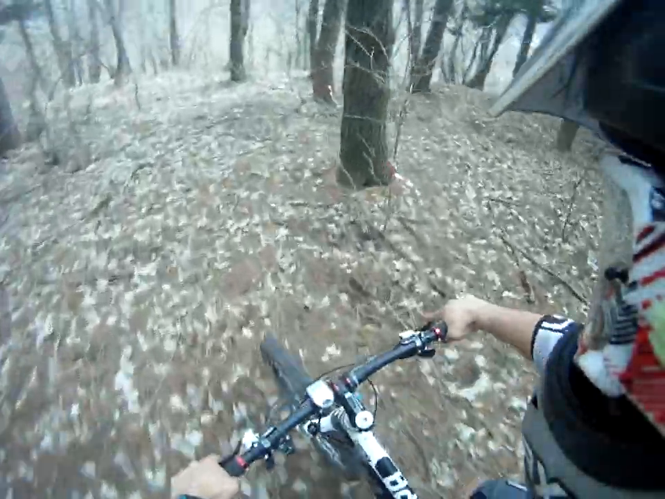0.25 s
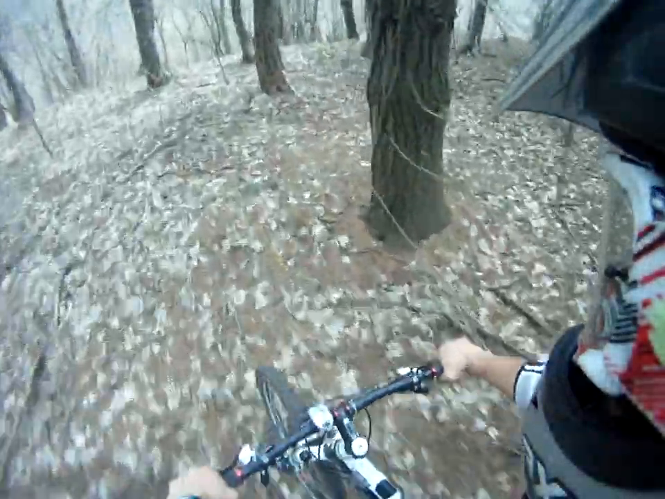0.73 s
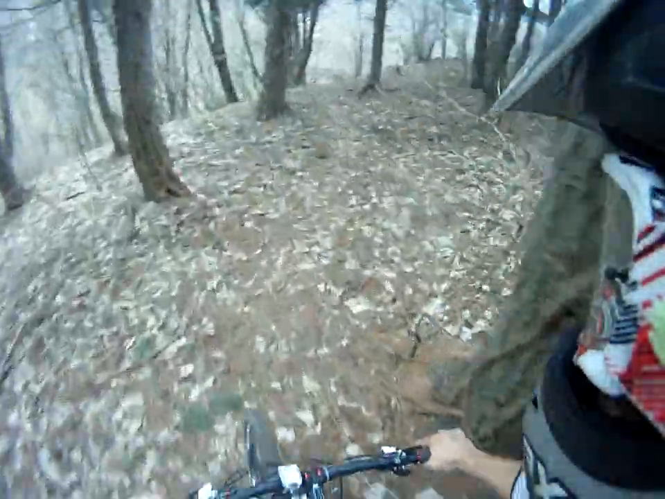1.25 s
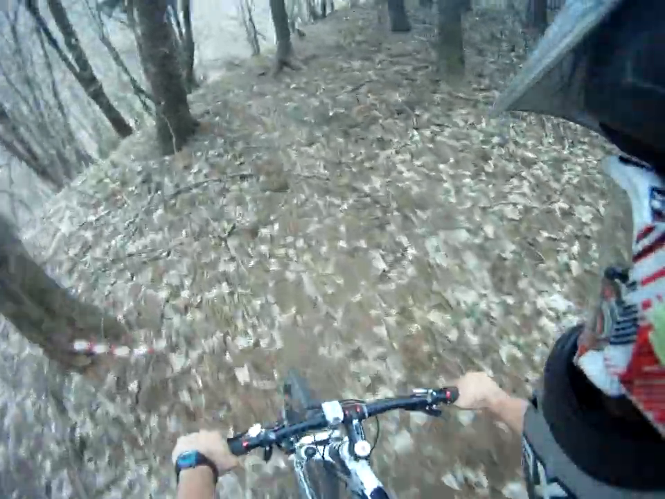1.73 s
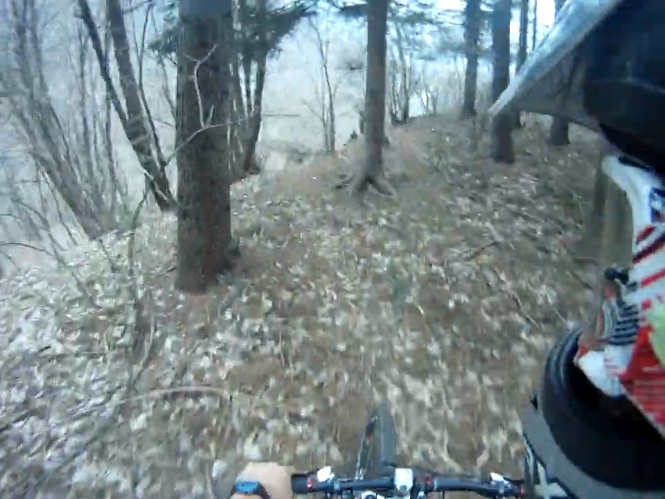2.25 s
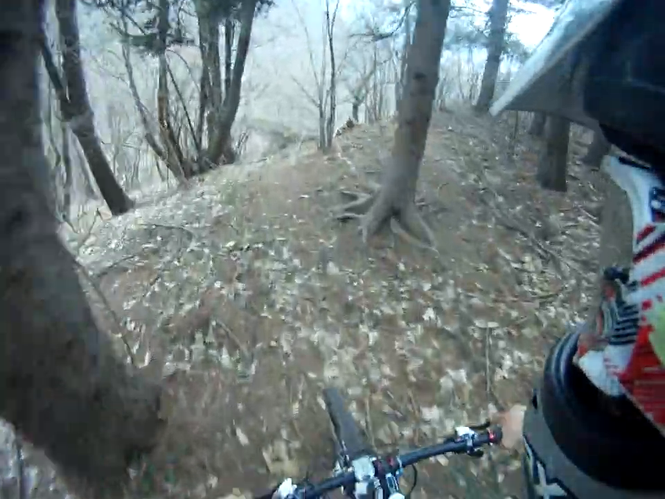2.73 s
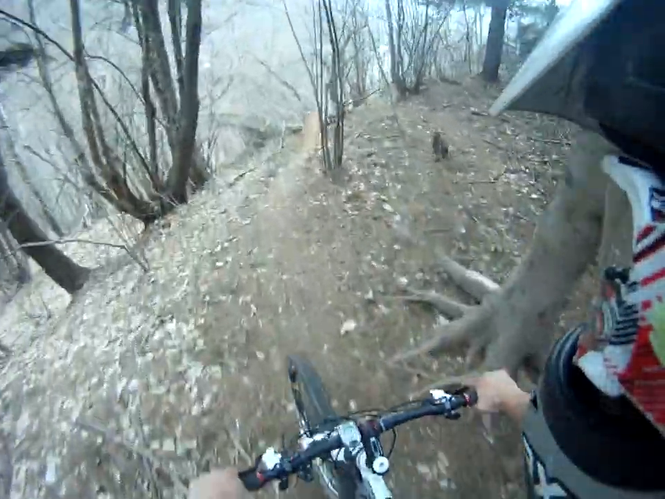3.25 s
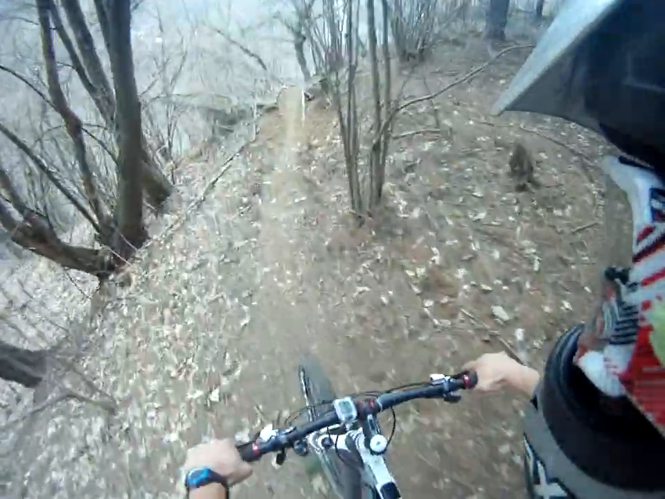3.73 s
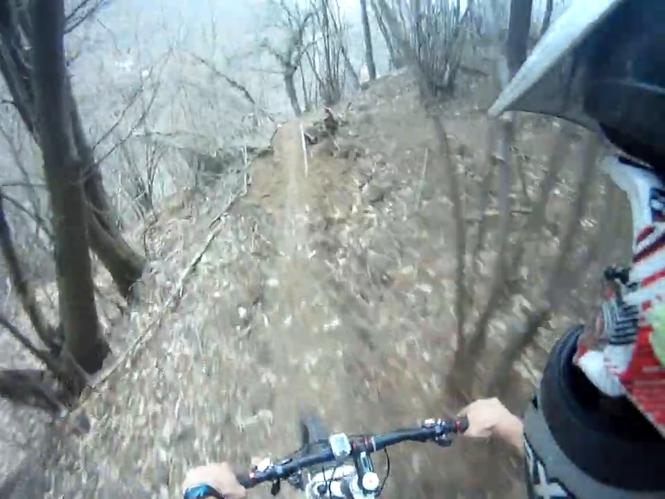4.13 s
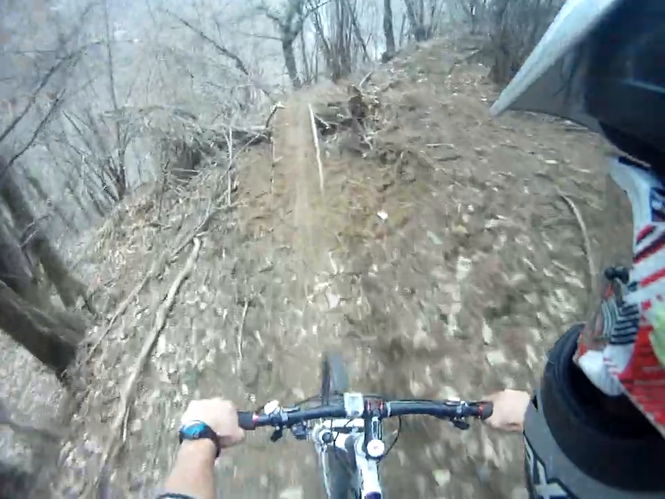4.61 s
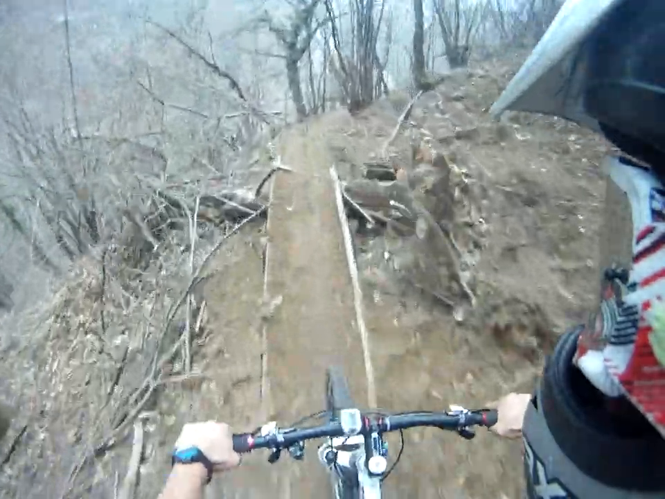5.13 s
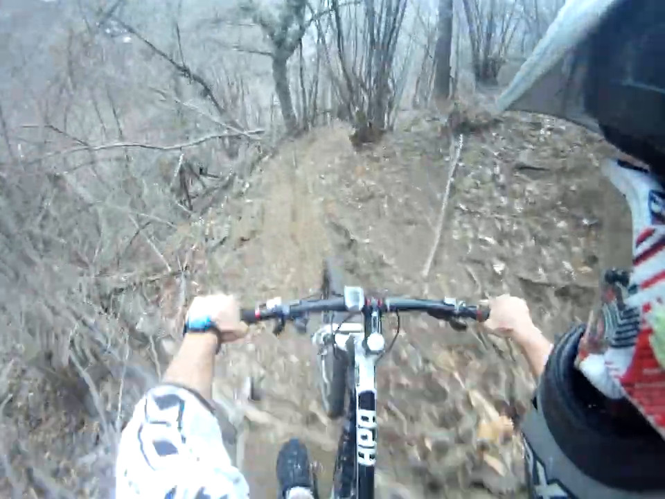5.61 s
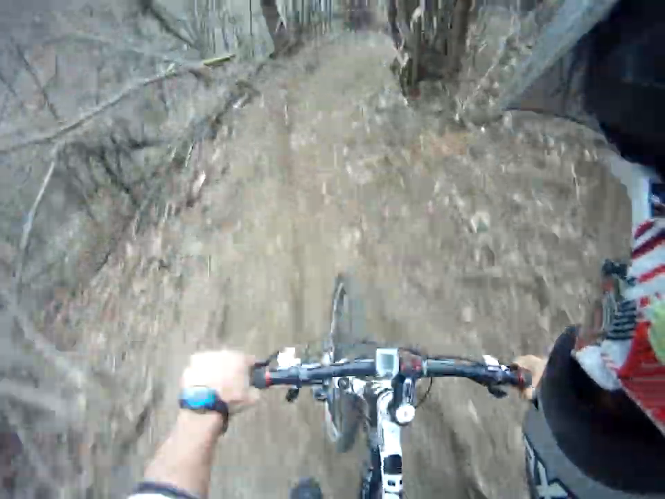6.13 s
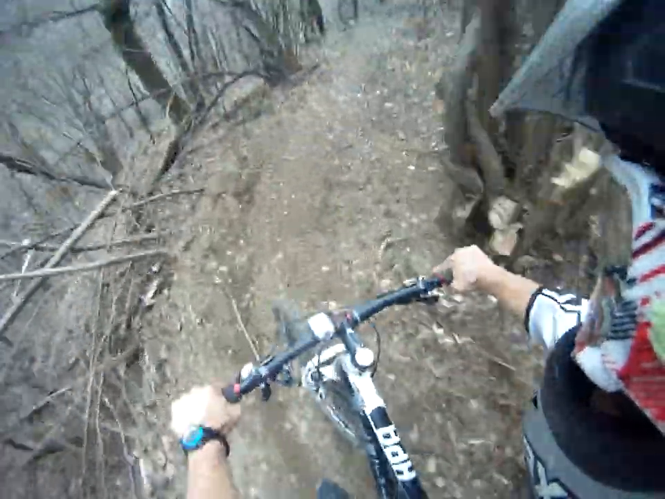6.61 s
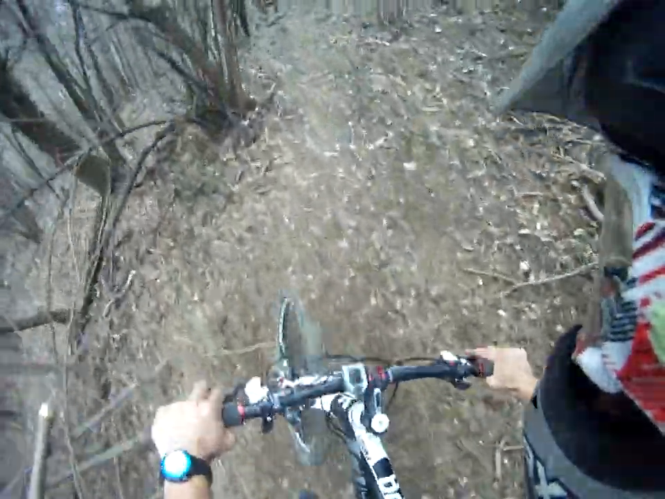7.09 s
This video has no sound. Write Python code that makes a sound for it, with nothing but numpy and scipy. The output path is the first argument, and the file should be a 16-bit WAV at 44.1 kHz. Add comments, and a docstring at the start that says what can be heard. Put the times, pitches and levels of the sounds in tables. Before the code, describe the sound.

Mountain bike tyres crunch fast through dry leaves, chain and frame rattling, a branch cracks loudly against the microphone, then a drop, hard landing and skid.

```python
"""Mountain bike tyres crush dry leaves on a forest trail; the microphone rides on the helmet in a plastic housing.
Below it knobs patter, drone and hum, and chain, frame and sticks clatter as noise bursts rung through resonances.
Close by, wind buffets as low noise. A thin branch whips the housing: decaying modes and scraping grains
overload the microphone and the gain control ducks. Late on the bike drops off a ledge, lands and skids."""
import sys
import numpy as np
from scipy import signal
from scipy.fft import rfft, irfft
from scipy.io import wavfile
from scipy.ndimage import uniform_filter1d, minimum_filter1d

SR = 44100
rng = np.random.default_rng(int(sys.argv[2]) if len(sys.argv) > 2 else 0)


def digitize_waveform(pressure):
    """Quantize a signal to 16-bit integers and store it at the path in sys.argv[1].

    Rows of a 2-D input are taken as channels; values are limited to [-1, 1].
    """
    field = np.atleast_2d(pressure).T
    bounded = np.clip(field, -1, 1)
    quanta = np.round(bounded * 32767).astype(np.int16)
    wavfile.write(sys.argv[1], SR, quanta)


N = 324557
TIME = np.arange(N) / SR   # s
CUTOFF_HZ = 15500

# How hard the tyres crush the leaves: [t/s, crunch level/dB before a small trim]
LEAF_CRUSH = [(0.0, -52), (0.35, -48), (1.27, -51), (1.66, -47.5), (2.03, -51), (2.64, -52), (3.11, -46),
              (3.75, -54), (4.16, -51.5), (5.76, -50), (6.37, -39), (6.44, -40), (6.58, -44), (6.91, -43.5),
              (7.19, -49.5), (7.36, -52.5)]
# Leaf spectrum, relative: [f/Hz, density/dB per Hz]
LEAF_COLOUR = [(200, -17), (600, -3.5), (1000, -2.5), (1600, -2), (2900, -3), (3800, -9), (5000, -11),
               (8000, -18), (11000, -17.5), (15000, -19.5)]
# Resonances and dips of the plastic housing: [f/Hz, width/Hz, height/dB]
HOUSING_PEAKS = [(2833, 560, 5), (4070, 220, -5.5), (4900, 670, 2.5), (6006, 870, -17.5), (7130, 670, 4),
                 (7990, 660, -3.5), (9140, 1630, 11), (11610, 400, 9), (11900, 440, -14.5), (12710, 350, 9),
                 (13300, 1000, -5), (14600, 700, 12)]

# How hard the tyres are pressed on the ground: [t/s, middle drone level/dB]
TYRE_DRONE = [(0, -50), (0.5, -42.5), (0.95, -50.5), (1.2, -50), (1.45, -47), (1.72, -44), (2.15, -50),
              (2.55, -46.5), (2.78, -47), (3.25, -42), (3.72, -50), (4.15, -47.5), (4.8, -47.5), (5.8, -45),
              (6.17, -39.5), (6.33, -30), (6.64, -41), (6.85, -37.5), (7.36, -44.5)]
# Tyre spectrum, relative: [f/Hz, density/dB per Hz]
TYRE_COLOUR = [(80, -7.5), (190, -6.5), (290, 1), (400, -3), (510, 2.5), (570, 1), (680, -2), (820, -13.5),
               (1200, -19.5), (3000, -72)]

# Air speed round the helmet, as buffeting: [t/s, middle level/dB]
AIR_SPEED = [(0, -53), (0.43, -43.5), (0.65, -47), (1.75, -51.5), (2.15, -50.5), (2.35, -42.5),
             (2.8, -44.5), (3.7, -50.5), (4.08, -48.5), (4.3, -39.5), (4.6, -46), (5.25, -37.5),
             (5.48, -41), (5.66, -35), (5.84, -39), (6.0, -29), (6.28, -35.5), (6.55, -39.5), (7.36, -60)]
# Wind spectrum, relative: [f/Hz, density/dB per Hz]
WIND_COLOUR = [(10, -8.5), (25, 0), (45, -0.5), (80, -0.5), (120, -6.5), (180, -8.5), (300, -14.5),
               (600, -21), (2000, -57)]

# Tread humming on patches of hard soil: [middle t/s, half length/s, level/dB, knob rate f/Hz at the middle]
TREAD_HUMS = [(0.24, 0.08, -39, 547), (1.5, 0.17, -49.5, 528), (3.32, 0.15, -42.5, 563),
              (4.13, 0.2, -47.5, 505), (6.5, 0.1, -40, 497), (7.05, 0.16, -48, 510.6)]
KNOB_GLIDE_HZ_PER_S, KNOB_JITTER, HUM_FLUTTER_DB = 90, 0.0469, 4.5   # jitter: rms fraction of the rate

# The light metal tick of the chain: [f/Hz, width/Hz, height/dB]
CHAIN_RINGS = [(2780, 640, 10), (5200, 2500, -3), (9200, 700, 7), (14800, 700, 5)]

# Frame parts and stones clacking over bumps:
# [t/s, level/dB, thud height/dB, clack height/dB, after-rattle/dB re the crack]
RATTLES = [(0.0752, -34, 20, 18, -13), (0.0804, -30.5, 17, -4, -12), (0.5467, -29.5, 14, 12, -35),
           (0.7844, -37.5, 11, 8, -13), (1.068, -36.5, 18, 6, -10), (1.3758, -34.5, 11, -3, -1),
           (1.4028, -33, 23, 7, -16), (1.6437, -30.5, -7, 10, -18), (1.649, -30.5, 7, 0, -18),
           (1.692, -29, -3, -1, -16), (1.772, -32.5, 11, 2, -1), (2.2707, -35, 12, 0, -5),
           (2.3276, -35.5, -8, 6, -9), (2.9941, -30, 5, 4, -14), (3.1243, -35, 27, 16, -26),
           (3.7249, -40, -6, 1, -21), (3.9654, -36, 10, 8, -16), (4.133, -39.5, -6, 16.5, -9),
           (4.1865, -35.5, 11, 6, -11), (4.221, -40.5, -2, 14, -2), (4.8404, -37.5, -11, 18, -29),
           (5.8765, -37, 1, -9, -23), (6.2542, -20, 6, 6, -2), (6.3104, -15, 6, -1, -26),
           (6.3639, -27.5, 6, 6, -1), (6.4098, -23.5, -2, 1, -13), (6.4278, -22, 6.5, 0, -17),
           (6.4597, -37, 2, 9, -15), (6.4991, -23.5, 13.5, 3, -7), (6.7361, -31.5, 24, 5, -23),
           (6.8857, -24.5, -9, 13, -37), (7.227, -36, -10, -1, -20)]
# Rattle spectrum, relative: [f/Hz, density/dB per Hz]
RATTLE_COLOUR = [(100, -8.5), (500, 10), (1000, 0), (2800, 5), (4000, -6), (7000, -10), (10000, -18),
                 (15000, -14.5)]
# What the rattling bike rings with: [f/Hz, width/Hz, height/dB]
FRAME_RINGS = [(1156, 60, 5.5), (1670, 64, 3), (2235, 140, 7), (2940, 76, 8), (3480, 110, 7),
               (4860, 510, 4.5), (7380, 440, 3), (9050, 490, 7.5), (10000, 1200, 7.5)]
# Lighter clacks at random times; their level is relative to the leaf crunch
JOLTS_PER_S, JOLT_DB, JOLT_SPREAD_DB = 4.6, 7.5, 1
JOLT_THUD_DB, JOLT_CLACK_DB, JOLT_AFTER_DB = -3, 11, -20   # thud and clack are middle values

# The suspension taking the ground: [t/s, level/dB, thud f/Hz]
THUMPS = [(0.123, -33.5, 280), (0.626, -35.5, 383), (1.933, -36, 372), (2.267, -33.5, 312),
          (2.46, -36.5, 378), (2.97, -33.5, 262), (3.199, -33, 314), (4.261, -34, 95), (4.316, -39, 80),
          (4.918, -34, 109), (5.629, -37, 62), (6.02, -26, 55), (6.062, -28, 55), (6.142, -31, 60),
          (6.2104, -21.5, 257), (6.225, -22.5, 136), (6.242, -21.5, 70), (6.498, -29, 444)]
# Thump spectrum, relative: [f/Hz, density/dB per Hz]
THUMP_COLOUR = [(20, 8.5), (60, -1), (120, 4.5), (250, -4.5), (550, -0.5), (1000, -17), (3000, -35)]

# The chain slapping the frame: [t/s, level/dB, crack t60/s, after-rattle/dB re the crack]
CHAIN_SLAPS = [(0.4936, -27, 0.0063, -27), (0.519, -32, 0.0076, -25), (1.5112, -17.5, 0.021, -9.5),
               (1.667, -32, 0.014, -31), (1.686, -26.5, 0.016, -15), (1.696, -30, 0.014, -30),
               (3.0598, -17.5, 0.014, -18), (5.3137, -30.5, 0.008, -19), (5.3287, -40, 0.008, -20)]
# Slap spectrum, relative: [f/Hz, density/dB per Hz]
SLAP_COLOUR = [(100, -13), (380, -3.5), (560, 6.5), (800, -10), (1200, -9), (1500, 0.5), (2000, -5.5),
               (2800, 3.5), (4000, -11), (5000, -13.5), (7000, -14), (10500, -24.5), (15000, -18)]
# What a slap rings with: [f/Hz, width/Hz, height/dB]
SLAP_RINGS = [(2020, 110, 6), (2940, 260, 1.5), (4500, 160, 10), (7530, 200, 4), (9150, 390, 9.5)]

# Dry twigs and sticks breaking under the wheels: [t/s, level/dB, crack t60/s]
STICKS = [(0.833, -32.5, 0.0054), (0.844, -40, 0.0078), (1.0352, -37, 0.006), (6.3071, -19, 0.044),
          (6.8862, -33, 0.0071)]
# Stick spectrum, relative: [f/Hz, density/dB per Hz]
STICK_COLOUR = [(500, -22), (1700, 12), (3000, -6), (4600, 1), (5600, -11), (7000, -4), (8000, -9),
                (10000, -2), (12000, -30), (15000, 1)]

# The branch striking and bouncing: [t/s, strength/dB, f/Hz that the contact favours]
BRANCH_BLOWS = [(2.6184, 1.5, 2800), (2.6197, 7, 600), (2.6222, 8.5, 5000), (2.628, -5.5, 1500),
                (2.636, -12, 3500), (2.641, -3.5, 800)]
# What the struck housing rings with: [f/Hz, level/dB re the blow, t60/s]
HOUSING_MODES = [(660, -8.5, 0.043), (757, -1.5, .045), (903, -1.5, 0.027), (1190, -8.5, 0.082),
                 (1590, -14, 0.019), (2130, -4, 0.023), (2500, -7.5, .02), (2776, -5.5, 0.021),
                 (3726, -3.5, 0.025), (3773, -3, 0.023), (5010, -7.5, 0.016), (6800, -16, 0.026),
                 (8080, -2.5, 0.03)]
# The bark catching and sliding off: [t/s, length/s, stroke gain/dB]
BARK_SCRAPES = [(2.6275, 0.0017, -12.5), (2.636, 0.0072, -16.5), (2.6508, 0.004, -5), (2.6578, 0.005, -6.5),
                (2.666, 0.005, -11.5)]
# Scrape spectrum, relative: [f/Hz, density/dB per Hz]
SCRAPE_COLOUR = [(200, -5), (900, -9.5), (2200, -1), (3800, 0), (5200, -3.5), (6000, -23), (7000, -7),
                 (9300, -7), (11000, -22.5), (12200, -38), (14700, -8), (16000, -23.5)]
# Resonances that the scraping wakes: [f/Hz, width/Hz, height/dB]
SCRAPE_RINGS = [(1185, 120, 6.5), (2245, 121, 4.5), (2897, 250, 4.5), (3240, 140, 0), (3950, 364, 5),
                (4900, 180, 3), (7060, 195.5, 7), (8230, 420, 5.5), (11400, 500, 9), (12730, 400, 10)]

# Hollow plastic knocks around the drop and landing: [t/s, level/dB, f/Hz]
PLASTIC_KNOCKS = [(5.7779, -20, 1980), (6.074, -24.5, 1160), (6.108, -29, 1020), (6.1309, -27.5, 1860),
                  (6.135, -36, 1110), (6.3067, -16.5, 1800), (6.3308, -21.5, 750)]
# Knock spectrum, relative: [f/Hz, density/dB per Hz]
KNOCK_COLOUR = [(150, -26), (700, 1), (2200, -7), (3200, -7), (4500, -14), (6000, -30), (8500, -15.5),
                (10300, -10), (12000, -32), (13800, -10), (15500, -24)]

# Tyres biting into loose dirt after the landing: [t/s, length/s, stroke gain/dB]
SKIDS = [(6.212, 0.056, -34), (6.31, 0.0069, -26), (6.375, 0.1, -33), (6.56, 0.058, -39.5),
         (6.778, 0.03, -35), (7.035, 0.034, -41)]
# Skid spectrum, relative: [f/Hz, density/dB per Hz]
SKID_COLOUR = [(300, -8), (1000, -6), (2000, 5), (3000, 0.5), (4000, -9.5), (5000, -6.5), (6000, -16),
               (7200, -7.5), (8000, -12), (9800, -8), (12000, -18), (14500, -5)]


def from_db(db):
    """Decibels to gain."""
    return 10 ** (np.asarray(db) / 20)


def rms_one(x):
    """Scale to unit power."""
    return x / np.sqrt(np.mean(x ** 2) + 1e-20)


def at_time(rows, s):
    """Value of a two-column [t/s, value] table at time s, along straight lines."""
    times, values = np.transpose(rows)
    return np.interp(s, times, values)


def decay(t, t60):
    """Exponential fade that falls 60 dB in t60 seconds."""
    return from_db(-60 * t / t60)


def add(track, s, sound):
    """Mix a sound in from time s."""
    start = int(s * SR)
    track[start:start + len(sound)] += sound[:N - start]


def drift(rate):
    """Smooth random wander of spread 1, with a new target rate times a second."""
    knots = rng.standard_normal(N // 20)
    return rms_one(np.interp(TIME * rate, np.arange(len(knots)), knots))


def response(colour, peaks=(), size=4096):
    """Causal (minimum-phase) impulse response of a spectrum with resonances on it."""
    hz = np.maximum(np.fft.rfftfreq(size, 1 / SR), 1)
    points_hz, points_db = np.transpose(colour)
    db = np.interp(np.log(hz), np.log(points_hz), points_db)
    for centre, width, height in peaks:
        db = db + height / (1 + (2 * (hz - centre) / width) ** 2)
    # folding the cepstrum onto positive time gives minimum phase
    cepstrum = irfft(np.log(from_db(db)))
    cepstrum[1:size // 2] *= 2
    cepstrum[size // 2 + 1:] = 0
    return irfft(np.exp(rfft(cepstrum)))[:size // 2]


def through(x, impulse):
    """Pass a sound through an impulse response."""
    return signal.oaconvolve(x, impulse)[:len(x)]


def grains(per_s, spread_db):
    """Random clicks, many small and a few large."""
    born = rng.random(N) < per_s / SR
    sizes = from_db(spread_db * np.minimum(rng.exponential(1, N), 5))
    signs = rng.choice([-1, 1], N)
    return rms_one(born * sizes * signs)


def snaps(low_hz, high_hz, per_s, spread_db, t60, ring_db, count=12, size=800):
    """Brittle things breaking; each kind crackles briefly around a pitch of its own."""
    out, t = np.zeros(N), np.arange(size) / SR
    for hz in np.geomspace(low_hz, high_hz, count):
        splinters = rng.standard_normal(size) * decay(t, t60)
        pitch = response([(hz, 0)], [(hz, hz / 3, ring_db)])
        snap = rms_one(through(splinters, pitch))
        out += through(grains(per_s / count, spread_db), snap)
    return rms_one(out)


def burst(envelope, impulse, level_db):
    """A cluster of tiny impacts under an envelope, rung through a body; the level is that of its loudest 3 ms."""
    impacts = envelope * rng.choice([-1, 1], len(envelope))
    hit = through(impacts, impulse)
    loudest = np.sqrt(uniform_filter1d(hit ** 2, size=128).max())
    return from_db(level_db) * hit / loudest


def clatter(after_db, crack_t60, after_t60=0.15, rise_s=.0003, bounces_per_s=450, size=8000):
    """Envelope of a contact: a short crack and a ragged after-rattle."""
    t = np.arange(size) / SR
    ragged_db = np.interp(t * bounces_per_s, np.arange(size), rng.uniform(-9, 5, size))
    after_rattle = from_db(after_db + ragged_db - 60 * t / after_t60)
    return np.minimum(t / rise_s, 1) * (decay(t, crack_t60) + after_rattle)


def strokes(rows, attack_s, release_t60):
    """Gain of a row of rubbing strokes: each rises, holds for its length and dies away."""
    gain = np.zeros(N)
    for s, length, db in rows:
        rise = np.clip((TIME - s) / attack_s, 0, 1)
        fade_db = 60 * np.clip((TIME - s - length) / release_t60, 0, 4)
        gain += from_db(db - fade_db) * rise
    return gain


def leaves(trim_db=-0.44):
    """Leaves under the wheels break in clumps of brittle snaps over a smooth noise rustle."""
    crackle = snaps(1100, 3300, per_s=600, spread_db=2.0, t60=0.017, ring_db=12.5)
    clumped = crackle * from_db(1.49 * drift(25))
    rustle = from_db(1.5) * rng.standard_normal(N)
    crunch = rms_one(through(clumped + rustle, response(LEAF_COLOUR, HOUSING_PEAKS)))
    return from_db(at_time(LEAF_CRUSH, TIME) + trim_db) * crunch


def tyres(bumps_db=1.23, bumps_per_s=25):
    """Knobs patter on the soil and boom in the casing, unevenly over small bumps."""
    patter = rms_one(through(grains(per_s=1500, spread_db=3.0), response(TYRE_COLOUR)))
    return from_db(at_time(TYRE_DRONE, TIME) + bumps_db * drift(bumps_per_s)) * patter


def wind(gust_db=-0.5, gusts_per_s=14):
    """Lumpy low noise buffets round the helmet, close to the microphone."""
    air = rms_one(through(rng.standard_normal(N), response(WIND_COLOUR)))
    return from_db(at_time(AIR_SPEED, TIME) + gust_db * drift(gusts_per_s)) * air


def tread():
    """On hard patches the knobs fall into an unsteady hum whose pitch climbs within each patch."""
    out, jitter = np.zeros(N), 1 + KNOB_JITTER * drift(110)
    for s, half_s, db, hz in TREAD_HUMS:
        near = np.abs(TIME - s) < 3 * half_s
        t = TIME[near] - s
        knob_hz = (hz + KNOB_GLIDE_HZ_PER_S * t) * jitter[near]
        phase = 2 * np.pi * np.cumsum(knob_hz) / SR
        out[near] += from_db(db) * np.exp(-(t / half_s) ** 2) * np.sin(phase)
    return out * from_db(HUM_FLUTTER_DB * drift(45))


def chain(per_s=23, unevenness=.3, db=6.0, spread_db=2.5, t60=0.011, size=900, count=260):
    """The swinging chain ticks crisply in a loose rhythm, harder where the ground is rough."""
    out, fade = np.zeros(N), decay(np.arange(size) / SR, t60)
    link = response(LEAF_COLOUR, HOUSING_PEAKS + CHAIN_RINGS)
    times = np.cumsum(np.exp(unevenness * rng.standard_normal(count))) / per_s
    forces = np.clip(rng.standard_normal(count), -2, 2)
    for s, force in zip(times[times < TIME[-1]], forces):
        level_db = at_time(LEAF_CRUSH, s) + db + spread_db * force
        add(out, s, burst(fade, link, level_db))
    return out


def rattles(contacts):
    """Each contact clatters through the frame with its own share of thud and clack."""
    out = np.zeros(N)
    for s, level_db, thud_db, clack_db, after_db in contacts:
        body = [(520, 1550, thud_db), (1540, 930, clack_db)]   # f/Hz, width/Hz, height/dB
        frame = response(RATTLE_COLOUR, HOUSING_PEAKS + FRAME_RINGS + body)
        add(out, s, burst(clatter(after_db, crack_t60=0.016), frame, level_db))
    return out


def jolts(count=80):
    """Light contacts at uneven intervals, harder where the ground is rough; rows like RATTLES."""
    times = np.cumsum(rng.uniform(.2, 1.8, count)) / JOLTS_PER_S
    chance = rng.standard_normal((count, 3))
    contacts = []
    for s, (force, thud, clack) in zip(times, chance):
        if s < TIME[-1]:
            level_db = at_time(LEAF_CRUSH, s) + JOLT_DB + JOLT_SPREAD_DB * force
            contacts.append((s, level_db, JOLT_THUD_DB + 5 * thud, JOLT_CLACK_DB + 5 * clack, JOLT_AFTER_DB))
    return contacts


def thumps(t60=0.086, size=6000):
    """A wheel meets the ground and shakes frame, rider and helmet."""
    out, fade = np.zeros(N), decay(np.arange(size) / SR, t60)
    for s, level_db, hz in THUMPS:
        add(out, s, burst(fade, response(THUMP_COLOUR, [(hz, hz / 2, 14)]), level_db))
    return out


def slaps():
    """The chain hits the stay with a bright metal ring, and its links settle."""
    out, metal = np.zeros(N), response(SLAP_COLOUR, HOUSING_PEAKS + SLAP_RINGS)
    for s, level_db, t60, after_db in CHAIN_SLAPS:
        add(out, s, burst(clatter(after_db, crack_t60=t60), metal, level_db))
    return out


def sticks(after_db=-15):
    """Dry wood breaks with a bright, splintering crack; thicker sticks take longer."""
    out, wood = np.zeros(N), response(STICK_COLOUR)
    for s, level_db, t60 in STICKS:
        add(out, s, burst(clatter(after_db, crack_t60=t60, after_t60=8.7 * t60), wood, level_db))
    return out


def squeak(s=1.139, length=0.0091, hz=1540, db=-44):
    """One faint, short squeak: a sine under a bell-shaped envelope."""
    return from_db(db) * np.exp(-((TIME - s) / length) ** 2) * np.sin(2 * np.pi * hz * TIME)


def mount_thud(t, hz=280, db=4.0, rise_s=.001, t60=0.024):
    """The whole mount jolts under the branch as one low, quickly damped swing."""
    return from_db(db) * decay(t, t60) * np.cos(2 * np.pi * hz * t) * (1 - np.exp(-t / rise_s))


def branch(lowest_hz=450, off_pitch_db=3.5, crack_db=-9, crack_t60=.016, thud_s=2.6193, size=6000):
    """A thud and fast blows ring the housing's modes; bark scrapes it between the later blows and after them."""
    out, cracks, t = np.zeros(N), np.zeros(N), np.arange(size) / SR
    for s, blow_db, contact_hz in BRANCH_BLOWS:
        add(cracks, s, from_db(blow_db + crack_db) * decay(t, crack_t60))
        for hz, db, t60 in HOUSING_MODES:
            octaves_off = abs(np.log2(hz / contact_hz))
            strength_db = blow_db + db - off_pitch_db * octaves_off
            phase = 2 * np.pi * (hz * t + .1 * rng.standard_normal())
            add(out, s, from_db(strength_db) * decay(t, t60) * np.sin(phase))
    rubbing = strokes(BARK_SCRAPES, attack_s=.0007, release_t60=0.023)
    bark = (cracks + rubbing) * grains(per_s=6500, spread_db=3.0)
    shell = response(SCRAPE_COLOUR, SCRAPE_RINGS)
    out += through(bark, shell / np.linalg.norm(shell))
    no_bass = signal.butter(4, lowest_hz, "high", fs=SR, output="sos")   # a small shell has no bass
    out = signal.sosfilt(no_bass, out)
    add(out, thud_s, mount_thud(t))
    return out


def knocks(t60=0.028, size=2000):
    """Loose plastic parts knock before and after the landing, each at a broad pitch."""
    out, fade = np.zeros(N), decay(np.arange(size) / SR, t60)
    for s, level_db, hz in PLASTIC_KNOCKS:
        add(out, s, burst(fade, response(KNOCK_COLOUR, [(hz, 700, 16)]), level_db))
    return out


def skid(clump_db=2.0, clumps_per_s=110):
    """Grit and twigs are ground under the sliding tyres in clumps of coarse grains."""
    grit = snaps(710, 6360, per_s=700, spread_db=4.0, t60=0.019, ring_db=15)
    clumped = grit * from_db(clump_db * drift(clumps_per_s))
    ground = rms_one(through(clumped, response(SKID_COLOUR, FRAME_RINGS)))
    return strokes(SKIDS, attack_s=0.0052, release_t60=0.096) * ground


def gain_control(x, threshold_db=-2, depth_db=13.0, hold_s=0.057, release_db_per_s=280, attack_s=0.0035):
    """An overload pulls the microphone gain down; it holds briefly, then recovers."""
    over_db = np.clip(20 * np.log10(np.abs(x) + 1e-9) - threshold_db, 0, depth_db)
    half = int(hold_s * SR / 2)
    held_db = -minimum_filter1d(-over_db, 2 * half + 1, origin=half)   # largest excess within the hold time
    # a running maximum against a steady slope lets the duck recover in a straight line
    fall_db = release_db_per_s * TIME
    duck_db = np.maximum.accumulate(held_db + fall_db, axis=-1) - fall_db
    pole = np.exp(-1 / (attack_s * SR))
    smooth_db = signal.lfilter([1 - pole], [1, -pole], duck_db)
    return x * from_db(-smooth_db)


def scene():
    """Ground, bike, wind and branch all reach one microphone on the helmet."""
    ground = leaves() + tyres() + tread() + thumps() + skid() + sticks()
    bike = rattles(RATTLES) + slaps() + knocks() + squeak() + chain()
    return (ground + bike + wind() + branch() + rattles(jolts()))[None]


def record(dry):
    """The gain ducks, the loudest peaks clip and the top is cut."""
    clipped = np.clip(gain_control(dry), -.95, .95)
    top_cut = signal.ellip(12, .2, 80, CUTOFF_HZ, fs=SR, output="sos")
    return signal.sosfilt(top_cut, clipped)


dry = scene()
out = record(dry)
digitize_waveform(out)
```